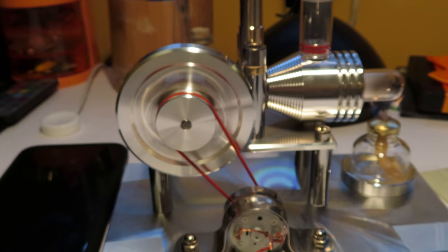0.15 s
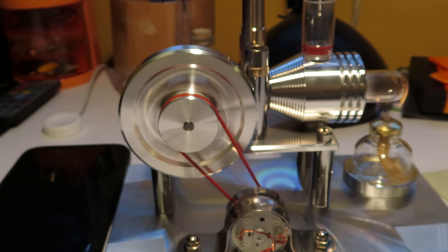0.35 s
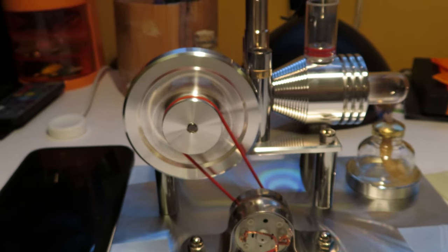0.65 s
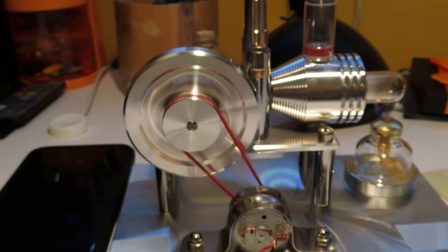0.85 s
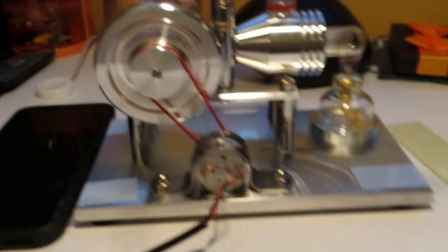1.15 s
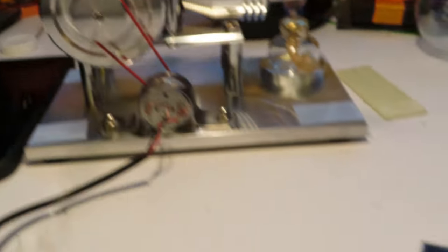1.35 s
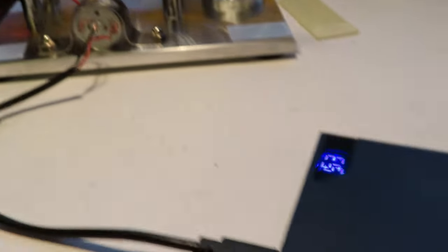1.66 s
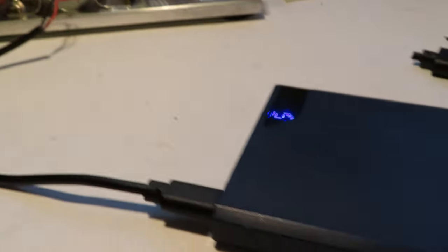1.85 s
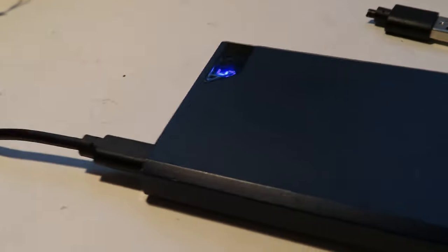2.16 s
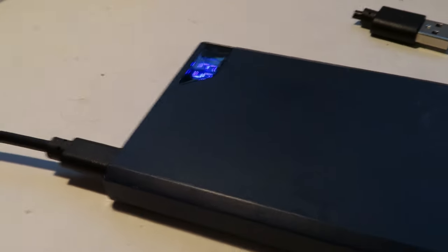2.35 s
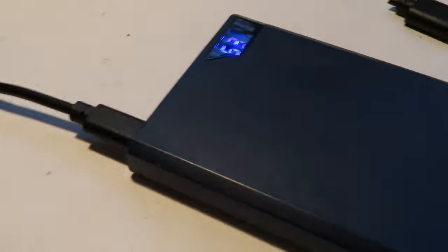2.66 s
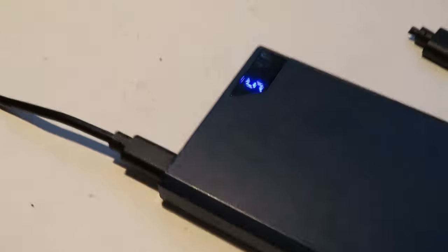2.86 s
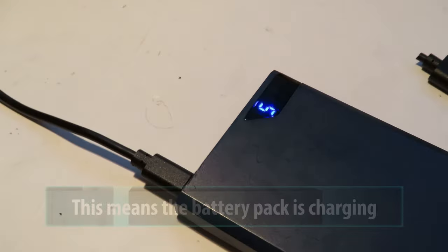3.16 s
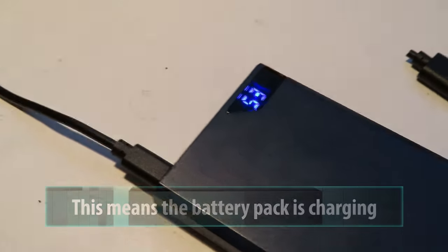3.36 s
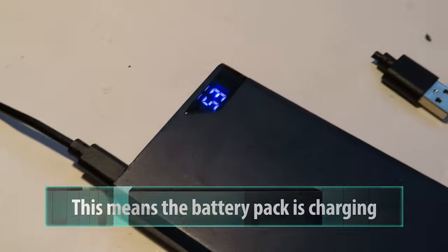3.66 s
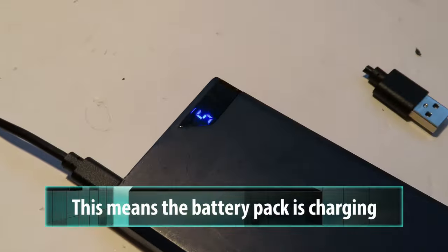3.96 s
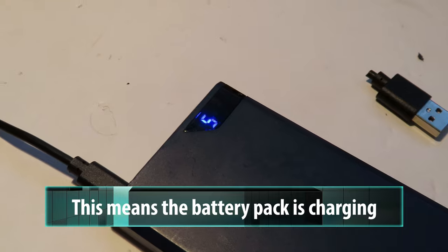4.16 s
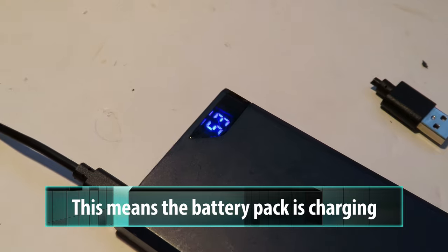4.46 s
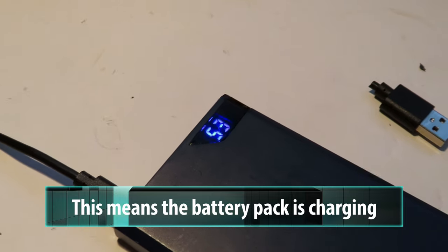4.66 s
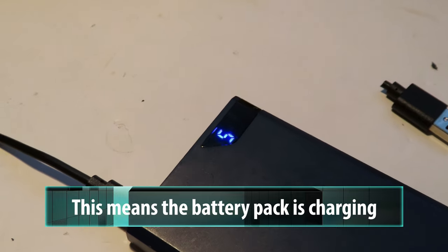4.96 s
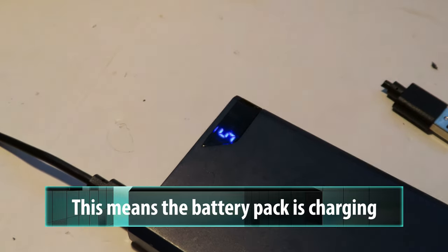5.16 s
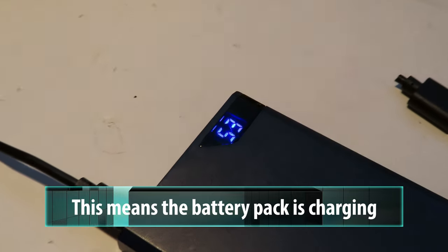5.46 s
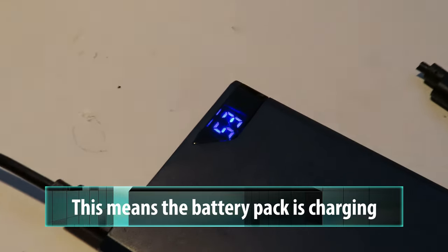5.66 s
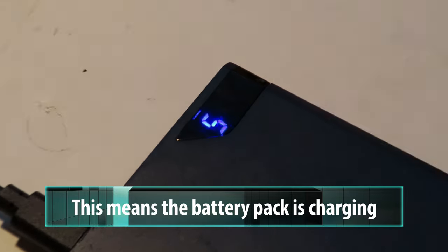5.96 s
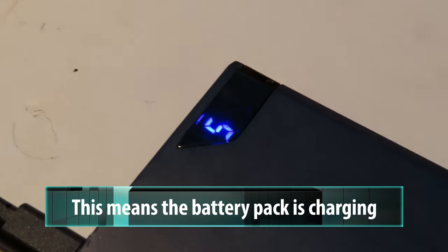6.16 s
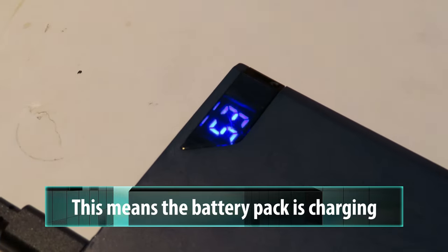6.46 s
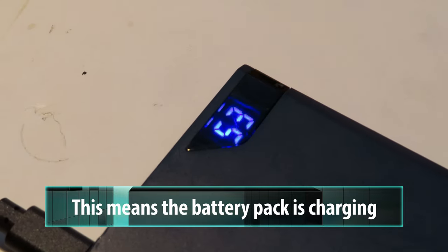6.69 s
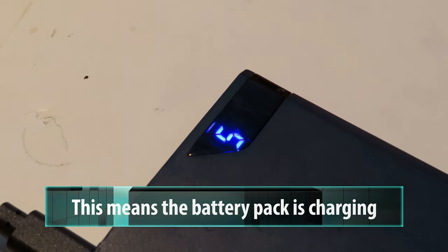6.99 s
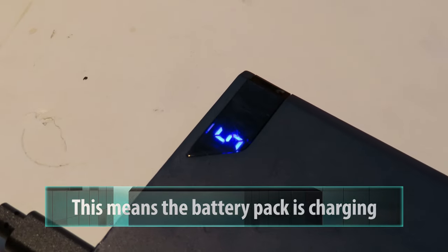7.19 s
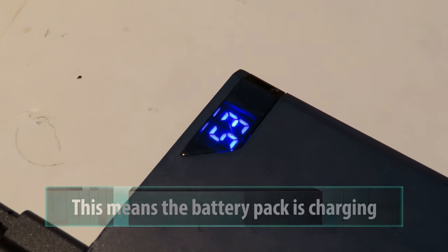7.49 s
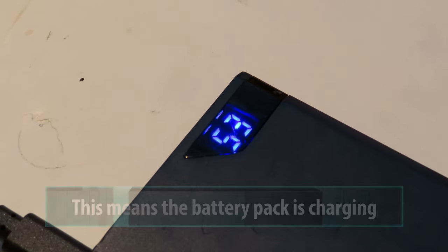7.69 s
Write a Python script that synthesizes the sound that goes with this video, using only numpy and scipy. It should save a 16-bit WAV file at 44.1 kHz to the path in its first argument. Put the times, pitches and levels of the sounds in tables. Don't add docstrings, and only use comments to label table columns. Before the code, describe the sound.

A small hot-air engine on a desk clatters hard and very fast, a close metallic buzzing rattle with a thin squeal and low desk hum.

```python
import sys
import numpy as np
from scipy import signal
from scipy.fft import rfft, irfft, next_fast_len
from scipy.io import wavfile
from scipy.ndimage import map_coordinates

SR = 44100
rng = np.random.default_rng(int(sys.argv[2]) if len(sys.argv) > 2 else 0)


def field_ratio(decibels):
    return 10 ** (np.asarray(decibels, dtype=float) / 20)


def generate_wav(sig):
    pcm = np.round(np.clip(np.atleast_2d(sig).T, -1, 1) * 32767).astype(np.int16)
    wavfile.write(sys.argv[1], SR, pcm)


N = 345303

# (time [s], aim [0 facing, 1 turning, 2 away], distance [m])
CAMERA_PATH = [(0, 0.091, 0.32), (1.3, 0.1, 0.27), (1.75, 0.63, 0.31), (2.3, 1.04, 0.29), (2.8, 1.2, 0.3),
               (3.05, 1.5, 0.29), (3.25, 1.84, 0.33), (4.6, 2.04, 0.37), (5.8, 2.06, 0.38),
               (6.9, 2.05, 0.42), (7.83, 2.07, 0.35)]
# (crank angle [turns], frame [dB], rods [dB], glass [dB], time scatter [ms])
KNOCKS = [(.215, -22, -9, -5, .08), (.258, 0, -1, -4, .04), (.3, -16, -2.5, 0, .05),
          (.335, -11, -8, -4, .06), (.43, -10, -11, -2, .1), (.55, -9, -14, -7, .1),
          (.67, -13, -2, -3, .05), (.7, -3, -8, -3, .06), (.74, -14, -15, -6, .06), (.8, -17, -11, -7, .12),
          (.96, -17, -13, -9, .1)]
BEARING_JOLTS = [
    (0.258, -1.0),
    (0.345, -0.81),
    (0.7, 0.55),
    (0.796, 0.14),
]
# (centre [Hz], width [Hz], facing [dB], turning [dB], away [dB])
PLATE_MODES = [(323, 25, 0.8, -0.3, -2.1), (523, 61, 14.9, 10.7, 10.3), (523, 41, 16.7, 14.2, 14.9),
               (694, 152, 19.3, 19.3, 17.9), (813, 44, 14.3, -21.3, -15.7), (936, 51, 11.2, 13.4, 8.9),
               (911, 114, 13.1, 16.5, 15.2)]
DESKTOP_MODES = [(310, 100, 1.5, 0.98, -2), (453, 8.3, 1, 0.62, -4), (525, 15, 1.6, 3.3, 6),
                 (1048, 17, 0, 1, 12.5)]
FRAME_MODES = [(1447, 67, -12, -8, -4.5), (1661.7, 44.7, 4.5, 3, 5), (2106, 159, -20, -5, 0),
               (2341, 36, -4, -1.5, -15), (2430, 330, -13.5, -13, -33), (3060, 210, -19, -26, -22),
               (2851, 35, -8, -10.5, -7)]
ROD_MODES = [(3710, 220, -32, -17.5, -19.5), (4300, 130, -17.5, -10, -10), (4615, 75, -7.5, 1.5, -7.5),
             (5035, 240, -19, -17, -12), (5447, 470, -23, -13.5, -15.5), (5354, 440, -20, -32, -18.5),
             (5800, 200, -38, -30, -36)]
GLASS_MODES = [(6470, 64, -40, -33, -32), (7166, 172, -29.5, -19.5, -21), (7800, 360, -41, -29, -28.5),
               (8350, 200, -32, -24.5, -22.5), (8860, 130, -35, -26, -42), (9550, 40, -36, -26, -31.5)]
SQUEAL_MODES = [(10210, 59, -25, -14.5, -14.5)]
CRACK_MODES = [(1400, 930, -19, -14.5, -30), (3150, 4960, -19, -18, -18.5),
               (5630, 4000, -19.5, -20.5, -21.5), (9000, 810, -43, -39, -47),
               (10600, 2800, -32.5, -30.5, -30), (12500, 820, -36, -34, -29.5), (13200, 530, -50, -39, -87)]
TICK_MODES = [(1967, 120, -8.5, -12, -5), (5310, 130, -36, 2, -35)]
# (crank angle [turns], pressure [dB])
BORE_PRESSURE = [(0, -7), (.2, -9), (.3, -7), (.47, 0), (.62, -1), (.72, -1), (.85, -3), (1, -7)]
# (shaft order [cycles per turn], rms level [dB])
HUM_ORDERS = [(1, -51.5), (2, -42), (3, -42.5), (4, -35.5), (5, -88), (7, -58.5)]
# (frequency [Hz], density [dB per Hz])
RUMBLE_SPECTRUM = [(22, -35), (35, 4), (55, -9), (110, 3.5), (170, 0), (260, -9.5), (400, -26.5)]
# (time [s], peak, not used [dB], creak [dB])
GRIP_CREAKS = [
    (2.319, -16, -27),
    (5.124, -16, -21),
]
# (frequency [Hz], density [dB per Hz])
AIR_SPECTRUM = [(25, -30), (60, -45), (150, -24), (300, 20), (600, 13.5), (1200, -27), (4000, -88),
                (16000, -70)]
# (frequency [Hz], level [dB])
PORT_DIFFERENCE = [(60, -53), (200, -28.5), (500, -31), (1300, -35), (2740, -23), (6410, -13),
                   (9810, -13.5), (15000, 1)]


def filtered(x, response):
    size = next_fast_len(N + SR // 4)
    spectrum = rfft(x, size) * response(np.fft.rfftfreq(size, 1 / SR))
    return irfft(spectrum, size)[..., :N]


def along(points, hz):
    point_hz, value = np.transpose(points)
    return np.interp(np.log(hz + 1), np.log(point_hz + 1), value)


def curves(rows):
    s, *columns = np.transpose(rows)
    return [np.interp(np.arange(N) / SR, s, column) for column in columns]


def wobble(rate):
    coarse = np.arange(0, N + 32, 32)
    knots = rng.standard_normal(int(N * rate / SR) + 4)
    return np.interp(np.arange(N), coarse, map_coordinates(knots, [coarse * rate / SR]))


def pulses(s, size):
    at = np.clip(s * SR, 8, N)[:, None]
    tap = np.floor(at) + np.arange(-7, 9)
    shape = np.sinc(tap - at) * np.cos(np.pi * (tap - at) / 16) ** 2
    return np.bincount(tap.astype(int).ravel(), (size[:, None] * shape).ravel(), N + 16)[:N]


def ring(force, modes, aim):
    table = np.array(modes)
    sign = (-1.) ** np.arange(len(table))

    def response(f):
        each = [1j * f * width / (centre ** 2 - f * f + 1j * f * width) for centre, width in table[:, :2]]
        return (sign[:, None] * field_ratio(table[:, 2:])).T @ np.array(each)

    share = np.clip(1 - np.abs(aim - np.arange(3)[:, None]), 0, 1)
    return np.sum(share * filtered(force, response), axis=0)


def crank():
    top_speed, cold_loss, drag_loss = 37.6183, .9101, .627
    warm_s, draught_s, drag_s, recover_s = 3.699, 6.6724, .2907, 1.524
    t = np.arange(N) / SR
    onset = np.clip((t - draught_s) / drag_s, 0, 1)
    recovery = np.exp(-np.clip(t - draught_s - drag_s, 0, None) / recover_s)
    speed = top_speed - cold_loss * np.exp(-t / warm_s) - drag_loss * onset * recovery
    return -.016 + np.cumsum(speed) / SR


def blows(turn, aim, order, scatter_db, rattle_db, rattle_t60, rub_db, loose, shade_db):
    table = np.array(KNOCKS)
    angle = np.arange(int(turn[-1]))[:, None] + table[:, 0]
    luck = rng.standard_normal(angle.shape + (2,))
    s = np.interp(angle, turn, np.arange(N) / SR)
    s = s + loose * table[:, -1] / 1000 * luck[..., 0]
    return_stroke = table[:, 0] > .5
    shaded_db = shade_db * np.interp(angle, turn, aim) * return_stroke
    blow_db = table[:, order] + shaded_db + scatter_db * luck[..., 1]
    blow = pulses(s.ravel(), field_ratio(blow_db).ravel())
    fading = field_ratio(-60 * np.arange(SR // 20) / SR / rattle_t60)
    rattle = field_ratio(rattle_db) * np.abs(signal.fftconvolve(blow, fading)[:N])
    rub = field_ratio(rub_db + 1.63 * wobble(40))
    return blow + (rattle + rub) * rng.standard_normal(N)


def links(turn, aim):
    frame = blows(turn, aim, order=1, scatter_db=1.3, rattle_db=-27, rattle_t60=.02,
                  rub_db=-38, loose=.75, shade_db=-2)
    rods = blows(turn, aim, order=2, scatter_db=1, rattle_db=-25, rattle_t60=.016,
                 rub_db=-34, loose=.4, shade_db=0)
    glass = blows(turn, aim, order=3, scatter_db=5, rattle_db=-11, rattle_t60=.016,
                  rub_db=-15, loose=.46, shade_db=1)
    crack = blows(turn, aim, order=2, scatter_db=2, rattle_db=-7, rattle_t60=.008,
                  rub_db=-14.5, loose=1, shade_db=-1.5)

    def small_soft_frame(f):
        centre_hz, width_hz, soft_hz = 2270, 2400, 5000
        radiated = 1j * f * width_hz / (centre_hz ** 2 - f * f + 1j * f * width_hz)
        return radiated / (1 + 1j * f / soft_hz)

    frame = filtered(frame, small_soft_frame)
    clatter = field_ratio(24.5) * ring(frame, FRAME_MODES, aim)
    clatter += field_ratio(20.5) * ring(rods, ROD_MODES, aim)
    clatter += field_ratio(10.5) * ring(glass, GLASS_MODES, aim)
    clatter += field_ratio(20) * ring(frame, TICK_MODES, aim)
    return clatter + field_ratio(7.5) * ring(crack, CRACK_MODES, aim)


def base(turn, aim):
    angle, push = np.transpose(BEARING_JOLTS)
    angle = np.arange(int(turn[-1]))[:, None] + angle
    s = np.interp(angle, turn, np.arange(N) / SR) + 2e-5 * rng.standard_normal(angle.shape)
    force = push * field_ratio(0.46 * rng.standard_normal(angle.shape))
    jolts = pulses(s.ravel(), force.ravel())
    plate_grind, desk_grind = field_ratio([[-41], [-32]]) * rng.standard_normal((2, N))
    return ring(jolts + plate_grind, PLATE_MODES, aim) + ring(jolts + desk_grind, DESKTOP_MODES, aim)


def piston(turn, aim):
    pressure_db = np.interp(turn % 1, *np.transpose(BORE_PRESSURE))
    pressure_db = pressure_db + 0.83 * wobble(14) + 1.5 * wobble(2.5)
    return field_ratio(3) * ring(field_ratio(pressure_db) * rng.standard_normal(N), SQUEAL_MODES, aim)


def generator(turn):
    rotor = 7.1 * turn + 0.28 * wobble(14)
    return field_ratio(-47.5 + 2.6 * wobble(12)) * np.sin(2 * np.pi * rotor)


def desk(turn):
    angle = turn - .45
    tones = np.zeros(N)
    for order, db in HUM_ORDERS:
        tones -= np.sqrt(2) * field_ratio(db + 0.14 * wobble(27)) * np.cos(2 * np.pi * order * angle)
    rumble = filtered(rng.standard_normal(N), lambda hz: field_ratio(along(RUMBLE_SPECTRUM, hz)))
    return tones + field_ratio(-44.5) * rumble / rumble.std()


def scattered(x):
    z = signal.stft(x, nperseg=256)[2]
    shuffle = np.exp(2j * np.pi * rng.random(z.shape))
    return signal.istft(z * shuffle, nperseg=256)[1][:N]


def grip():
    s, _, creak_db = np.transpose(GRIP_CREAKS)
    fading = field_ratio(-60 * np.arange(SR // 8) / SR / 0.1)
    envelope = np.abs(signal.fftconvolve(pulses(s, field_ratio(creak_db)), fading)[:N])

    def dull(hz):
        return field_ratio(7) * hz * 700 / (700 ** 2 + hz ** 2) / (1 + (hz / 1900) ** 2)

    return np.array([[1], [-1]]) * filtered(envelope * rng.standard_normal(N), dull)


def room():
    air = filtered(rng.standard_normal((2, N)), lambda hz: field_ratio(along(AIR_SPECTRUM, hz)))
    mid, side = air / air.std() * field_ratio([[-49], [-57]])
    return np.array([mid + side, mid - side])


def scene():
    turn = crank()
    aim, distance_m = curves(CAMERA_PATH)
    near_db = 3.5 - 20 * np.log10(distance_m / .3)
    body_db = np.interp(aim, range(3), [-.5, -4, -1.54])
    sideways_db = np.interp(aim, range(3), [5, 8.5, 3.5])
    direct = field_ratio(near_db + body_db) * (links(turn, aim) + piston(turn, aim)) + base(turn, aim)
    direct += field_ratio(near_db) * (desk(turn) + generator(turn))
    side = filtered(scattered(direct) + 0.08 * direct, lambda hz: field_ratio(0.5 + along(PORT_DIFFERENCE, hz)))
    side += filtered(direct, lambda hz: .5j * field_ratio(along(PORT_DIFFERENCE, hz)))
    treble_side = filtered(side, lambda hz: np.exp(-np.log((hz + 1) / 5300) ** 2 / 0.43))
    side += (field_ratio(sideways_db) - 1) * treble_side
    return np.array([direct + side, direct - side]) + room() + grip()


def low_pass(x):
    return signal.sosfilt(signal.butter(12, 15870, fs=SR, output="sos"), x)


def record(dry):
    def camera_band(hz):
        bass_cut = hz ** 2 / (hz ** 2 + 22 ** 2)
        return bass_cut * (hz < 15800) * field_ratio(-7. * (hz > 15150))

    heard = filtered(dry, camera_band)
    return low_pass(heard)


dry = scene()
out = record(dry)
generate_wav(out)
```